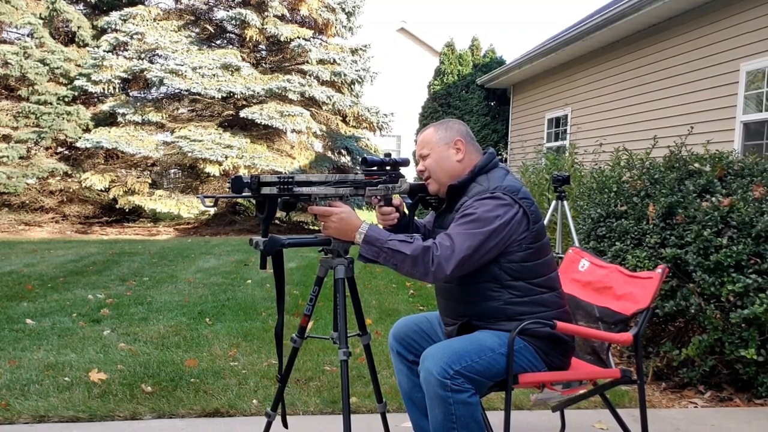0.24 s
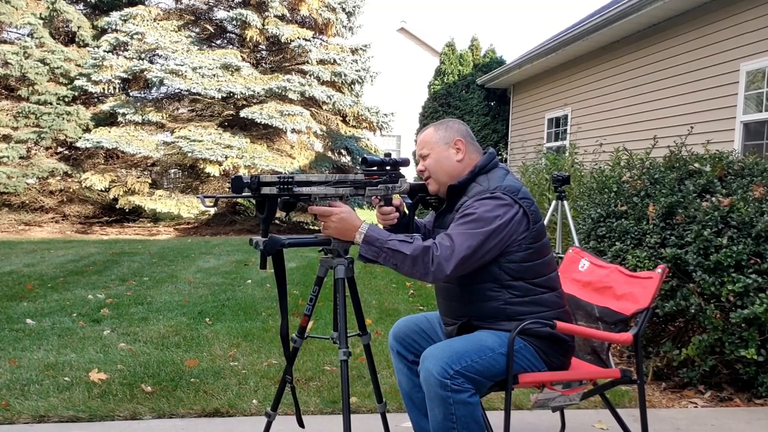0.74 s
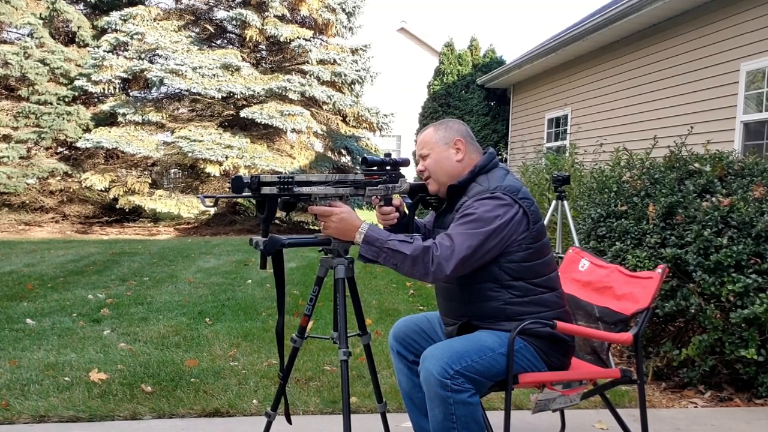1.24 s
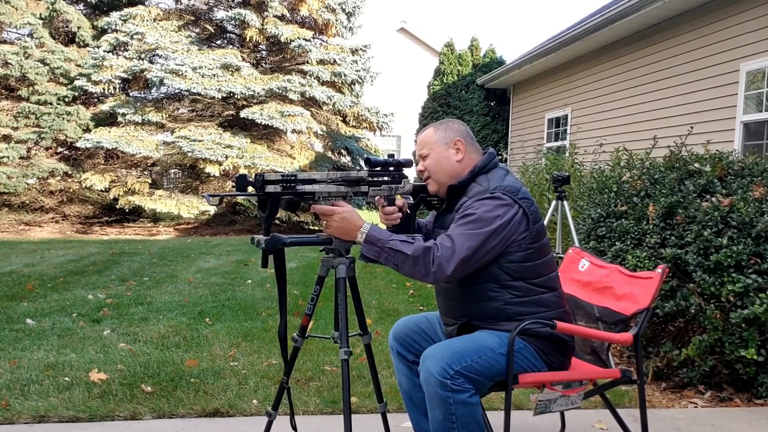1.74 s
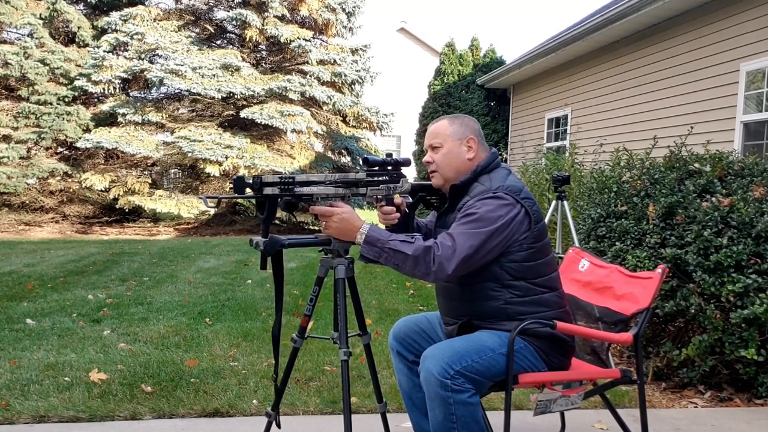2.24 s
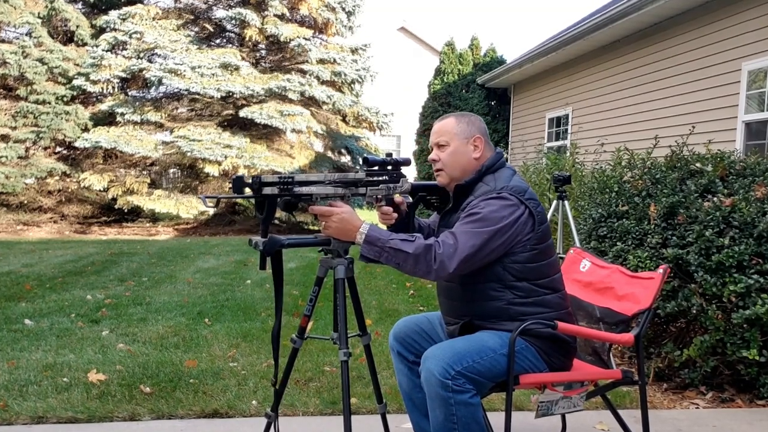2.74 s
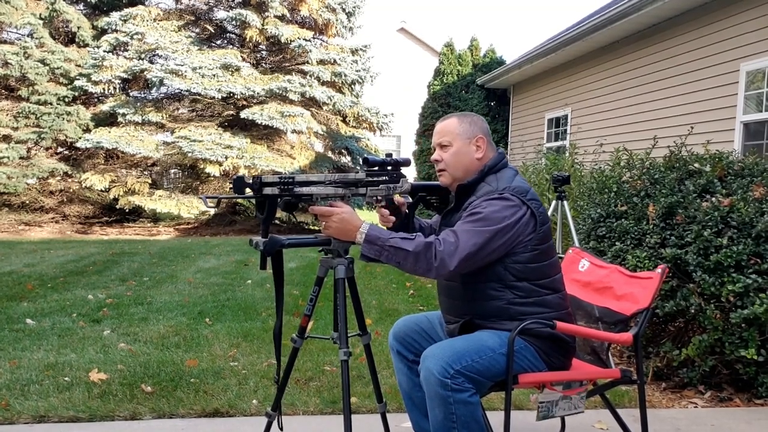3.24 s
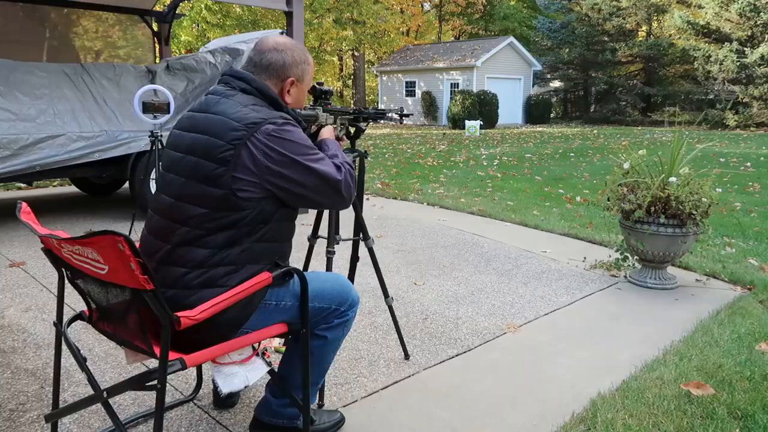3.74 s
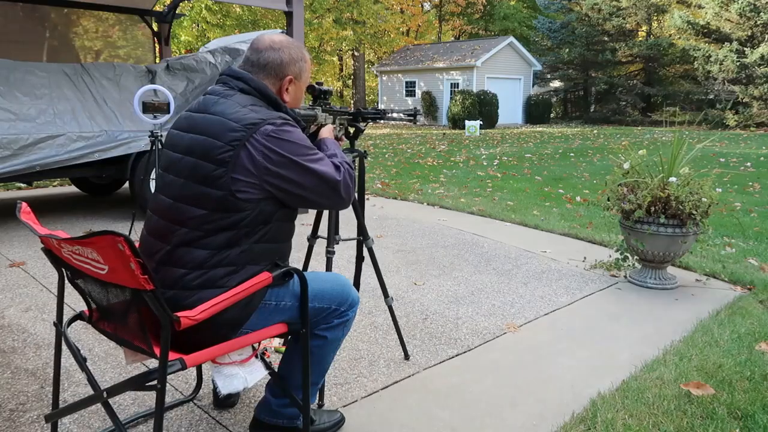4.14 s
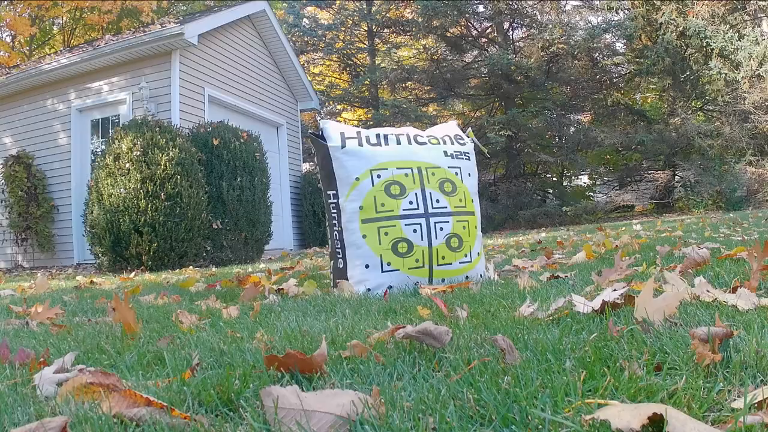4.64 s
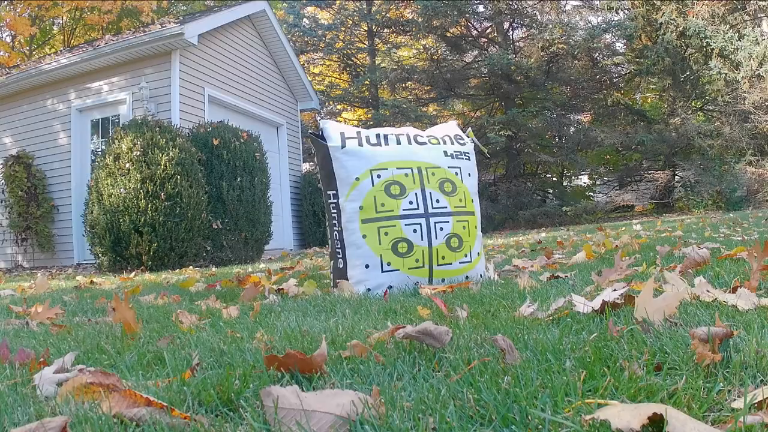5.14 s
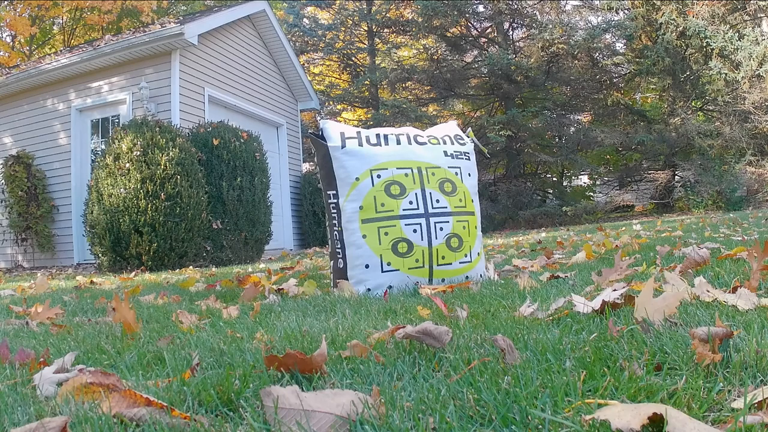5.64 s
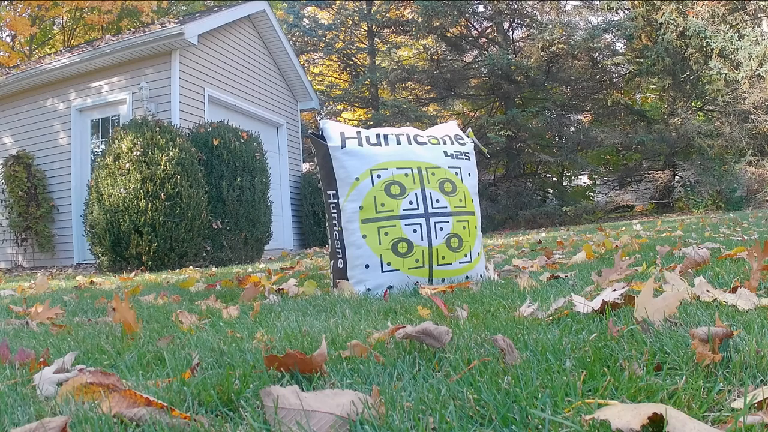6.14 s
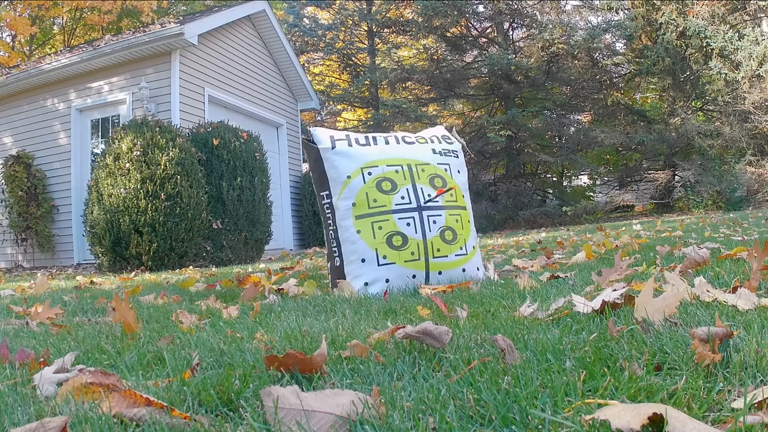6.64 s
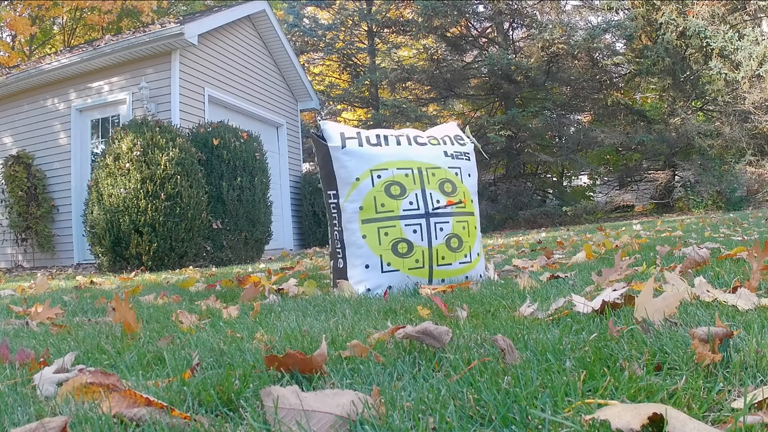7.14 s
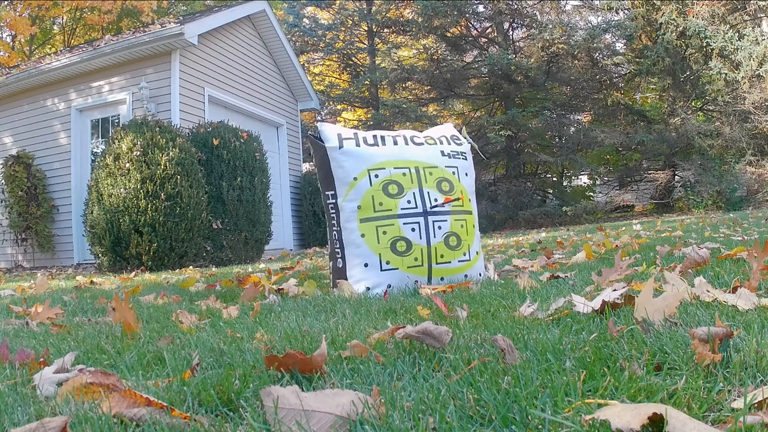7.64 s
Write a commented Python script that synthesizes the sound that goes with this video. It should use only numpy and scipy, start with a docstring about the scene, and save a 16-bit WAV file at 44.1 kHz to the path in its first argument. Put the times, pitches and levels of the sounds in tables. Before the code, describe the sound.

After low wind thuds on the microphone, a crossbow snaps and its bolt smacks a stuffed bag, three times from different outdoor spots.

```python
"""A crossbow is shot in a backyard and heard three times: from the side, from behind the shooter, at the target.
Shaped noise makes the latch and string snap and the frame rattle; short pulses kick the stock; sines ring its metal.
The bolt rushes in as swelling noise and hits a stuffed bag: one pulse slaps the cover, a later one is the thump.
Buildings, trees and lawn return the blows as filtered, smeared echoes and a diffuse tail; the loudest blows clip.
Wind noise buffets the microphone, mostly at the first place, over rumble, hiss and thin tones."""
import sys
import numpy as np
from scipy import signal
from scipy.fft import rfft, irfft, next_fast_len
from scipy.io import wavfile
from scipy.ndimage import uniform_filter1d

SR = 44100
rng = np.random.default_rng(int(sys.argv[2]) if len(sys.argv) > 2 else 0)


def generate_wav(sig):
    """Save sig (samples, or channels by samples) to the path in sys.argv[1] as 16-bit PCM at SR."""
    pcm = np.round(np.clip(np.atleast_2d(sig).T, -1, 1) * 32767).astype(np.int16)
    wavfile.write(sys.argv[1], SR, pcm)


N = 348390
TIME = np.arange(N) / SR  # s

# borders between the listening places: (time [s])
PLACE_BORDERS = [0, 3.385, 4.675, 8]
# the bolt hits, one row a place: (time [s], slap peak [dB], lag of the thump [s], thump peak [dB])
BOLT_HITS = [(2.0406, 2, 0.004, -2), (4.1567, 1, .0037, -6), (6.4834, 6.5, 0.0026, 7.5)]
# string, cables and limbs rattle, one row a place: (time of the top [s], rms level [dB], rise [s], hold [s],
# fall [dB/s], after-ring against the top [dB], fade of the after-ring [dB/s])
FRAME_RATTLES = [(1.831, -12, 0.0032, .028, 619, -22.5, 117.5),
                 (3.938, -14.5, 0.0049, 0.0055, 540.5, -20.5, 260),
                 (6.359, -38, 0.002016, 0.00198, 1699, -16, 131)]
# diffuse return of the yard, one row a place: (bow send [dB], slap send [dB], thump send [dB], build-up [s])
YARD_RETURNS = [(-27.5, -9, -14.5, 0.035), (-30.5, -13, -12, 0.026), (-24, -26, -32, 0.0606)]
# microphones, one row a place: (left-right likeness of reflections [0-1], lead of the right port [samples])
MICROPHONE_PORTS = [(.45, 17), (.85, 0), (1, 0)]


def amp(db):
    """Decibels to gain."""
    return 10 ** (np.asarray(db) / 20)


def unit(x):
    """Scales to rms 1."""
    return x / np.sqrt(np.mean(x ** 2) + 1e-20)


def read(points, hz):
    """Reads a spectrum on a log-frequency axis."""
    f, value = np.transpose(points)
    return np.interp(np.log(hz + 1), np.log(f + 1), value)


def level(points):
    """Gain along a curve of (time [s], level [dB]), silent outside it."""
    s, db = np.transpose(points)
    return amp(np.interp(TIME, s, db)) * (TIME >= s[0]) * (TIME <= s[-1])


def bell(s, width):
    """A smooth Gaussian swell of height 1 around the time s; width is its standard deviation in s."""
    return np.exp(-0.5 * np.minimum(((TIME - s) / width) ** 2, 40))


def sunk(s):
    """Goes from 0 to 1 just after the time s."""
    sink_s = 0.15
    return np.clip((TIME - s) / sink_s, 0, 1)


def heard(place):
    """1 while a place is listened to, else 0, with edges some 3 ms long."""
    inside = (TIME >= PLACE_BORDERS[place]) * (TIME < PLACE_BORDERS[place + 1])
    return uniform_filter1d(1.0 * inside, size=128)


def within(rows, place):
    """The events heard from one place."""
    return [row for row in rows if PLACE_BORDERS[place] <= row[0] < PLACE_BORDERS[place + 1]]


def placed(s, sound):
    """A track that is silent but for one sound starting at s."""
    track = np.zeros(sound.shape[:-1] + (N,))
    part = track[..., round(s * SR):][..., :sound.shape[-1]]
    part += sound[..., :part.shape[-1]]
    return track


def noise(colour, same, size=N):
    """Two channels of coloured noise of joint rms 1; same is their likeness, a number or a curve over Hz."""
    n = next_fast_len(size)
    hz = np.fft.rfftfreq(n, 1 / SR)
    left, other = rfft(rng.standard_normal((2, n)))
    likeness = np.clip(same if np.isscalar(same) else read(same, hz), -1, 1)
    right = likeness * left + np.sqrt(1 - likeness ** 2) * other
    spectrum = np.array([left, right]) * amp(read(colour, hz))
    return unit(irfft(spectrum, n)[:, :size])


def scatter(same, size):
    """Dense random values for two ports, alike by the share same."""
    left, other = rng.standard_normal((2, size))
    same = np.clip(same, -1, 1)
    return np.array([left, same * left + np.sqrt(1 - same ** 2) * other])


def lumps(length, depth_db, size):
    """A random gain of rms 1 that wanders over about size steps."""
    wander = unit(uniform_filter1d(rng.standard_normal(length), size))
    return unit(amp(depth_db * wander))


def whistle(hz, width_hz, same):
    """A fuzzy tone of rms 1: a narrow band of noise around a steady or moving pitch."""
    low_pass = signal.butter(2, width_hz / 2, fs=SR, output="sos")
    slow = signal.sosfilt(low_pass, scatter(same, N) + 1j * scatter(same, N))
    cycles = np.cumsum(hz * np.ones(N)) / SR
    return unit((slow * np.exp(2j * np.pi * cycles)).real)


def blow(colour, pitch=1, size=4096):
    """A minimum-phase pulse of given colour and peak 1: its energy comes as early as a causal pulse allows."""
    hz = np.fft.rfftfreq(size, 1 / SR) / pitch
    log_gain = np.log(amp(read(colour, hz)))
    log_gain -= 2 * np.log(np.maximum(hz / colour[-1][0], 1))  # falls away above the last point
    mirrored = np.r_[log_gain, log_gain[-2:0:-1]]
    pulse = np.fft.ifft(np.exp(np.conj(signal.hilbert(mirrored)))).real[:size // 2]
    return pulse / abs(pulse).max()


def through(x, response):
    """Passes a sound through a two-channel response."""
    return signal.oaconvolve(np.atleast_2d(x), response, axes=1)[:, :N]


def band_limit(x, hz):
    """A steep low-pass."""
    taps = signal.firwin(255, hz, window=("kaiser", 8), fs=SR)
    return signal.oaconvolve(x, taps[None], "same", axes=1)


def tones():
    """Narrow noise bands: a distant tone dies away from the start; a thin whine at the second place sinks."""
    far_db, far_fade_db_per_s = -65.5, 26
    far = amp(far_db - far_fade_db_per_s * TIME) * whistle(1940, width_hz=12, same=0.32)
    whine_db, whine_sink_db = -81, 13.5  # level before the shot, and its drop after it
    whine_gain = amp(whine_db - whine_sink_db * sunk(FRAME_RATTLES[1][0]))
    whine = whine_gain * whistle(12960, width_hz=60, same=0.5)
    return far + heard(1) * whine


def air(place, split_hz=400):
    """Far rumble and the hiss of the open air, split from one noise wash; both sink after the hit."""
    # outdoor air, one colour a place: (frequency [Hz], relative level [dB])
    air_colour = [
        [(15, -64), (25, -34), (48, -8), (88, -11), (128, 0.02), (186, -8), (219, -15), (318, -19), (415, -33),
         (749, -30), (1280, -36), (1910, -32), (3800, -35), (5200, -40), (6500, -36), (8100, -42),
         (11200, -35.5), (15000, -44)],
        [(15, -40), (25, -10), (86, -8), (128, 0.94), (158, -11), (196, -13), (278, -19), (709, -20),
         (1180, -25), (1350, -25), (3540, -32), (9770, -51), (12400, -55), (13500, -53), (15000, -97)],
        [(15, -30), (25, 0.07), (38, -4), (70, -1), (96, -12), (129, -1), (152, -19), (183, -14), (204, -22),
         (233, -19), (389, -28), (470, -25), (649, -29), (4150, -40), (15500, -42)],
    ]
    # left-right likeness of the air, one curve a place: (frequency [Hz], likeness [0-1])
    air_same = [
        [(60, 0.75), (300, 0.64), (1400, 0), (15000, 0)],
        [(100, 1), (300, .6), (1400, .7), (3100, 0.4), (9000, 0.029)],
        [(60, 1), (15000, 1)],
    ]
    # one row a place: (rumble before the hit [dB], settled hiss before the hit [dB], rumble drop [dB], hiss drop [dB])
    air_levels = [(-56.5, -62.5, 1.5, 7.5), (-45, -51, 11.5, 10.5), (-60, -73.5, 0.5, 0.5)]
    rumble_db, hiss_db, rumble_sink_db, hiss_sink_db = air_levels[place]
    after = sunk(BOLT_HITS[place][0])
    wash = noise(air_colour[place], air_same[place])
    rumble = signal.sosfiltfilt(signal.butter(3, split_hz, fs=SR, output="sos"), wash)
    hiss = wash - rumble
    opening_db = 7 * np.exp(-TIME / 0.27)  # the hiss starts louder and settles
    rumble_gain = amp(rumble_db - rumble_sink_db * after)
    hiss_gain = amp(hiss_db + opening_db - hiss_sink_db * after)
    return rumble_gain * unit(rumble) + hiss_gain * unit(hiss)


def wind():
    """Turbulent eddies hit each port on its own; the hardest ones flutter higher up, and each gust sighs."""
    # gusts at the first microphone: (time [s], width [s], rumble [dB], sigh [dB], sigh pitch at the top [Hz])
    gusts = [(.45, .18, -31.5, -55, 865), (1.22, 0.2, -36, -68.5, 963.7)]
    # single eddies that buffet the microphone: (time [s], rms level [dB], width [s], left against right [dB])
    buffets = [(.005, -25.5, 0.031, -1.5), (0.163, -17.5, 0.037, -7.5), (.208, -7, .005, 2.5),
               (0.389, -12, 0.013, -22), (.434, -11, .0098, -11), (0.53, -13.5, 0.024, -15.5),
               (0.564, -11.5, 0.0065, -8), (0.941, -27.5, 0.034, 3), (1.207, -23.5, 0.0076, -6),
               (3.037, -37, 0.018, 9), (3.454, -33.5, 0.018, 2)]
    # low roar of the eddies: (frequency [Hz], relative level [dB])
    wind_colour = [(20, -13.5), (45, 2), (70, 8), (130, -4.5), (200, -14.5), (330, -30), (600, -47.5),
                   (1200, -61.5), (3000, -87)]
    flutter_colour = [(60, -11.5), (170, 8.5), (300, -11.0), (600, -31), (1200, -38.0), (3000, -73)]
    breeze_db = -58  # what stirs between the gusts
    sigh_sag_hz_per_s = 450  # each sigh sinks in pitch as its gust passes
    power = np.ones((2, 1)) * (amp(breeze_db) * heard(0)) ** 2
    sighs = np.zeros((2, N))
    for s, width, rumble_db, sigh_db, hz in gusts:
        swell = bell(s, width)
        power += (amp(rumble_db) * swell) ** 2
        pitch_hz = hz - sigh_sag_hz_per_s * (TIME - s)
        sighs += amp(sigh_db) * swell ** 1.7 * whistle(pitch_hz, width_hz=210, same=0.5)
    for s, db, width, pan_db in buffets:
        sides = unit(amp([[pan_db], [0]]))
        power += (amp(db) * sides * bell(s, width)) ** 2
    eddies = noise(wind_colour, 0)
    # even out the noise, so that the gusts and buffets alone set its strength
    local_power = uniform_filter1d(uniform_filter1d(eddies ** 2, size=900), size=900)
    eddies /= np.sqrt(local_power)
    flutter = amp(-8.5) * power * noise(flutter_colour, 0)
    return np.sqrt(power) * eddies + flutter + sighs


def wall(place, delay, smear):
    """One echo: a flat wall is a mirror, a rough one smears the sound, and long paths lose their treble."""
    t = TIME[:SR // 4]
    if smear < 0.0006:
        taps = np.ones((2, 1)) * (t == 0)
    else:
        taps = scatter(MICROPHONE_PORTS[place][0], len(t)) * t * np.exp(-t / smear)
    taps /= np.linalg.norm(taps, axis=1, keepdims=True)
    dull_hz = 15000 / (1 + delay / 0.07)
    return signal.sosfilt(signal.butter(3, dull_hz, fs=SR, output="sos"), taps)


def yard(place):
    """Uneven scatter from lawn, trees and siding: it builds up, then each band fades at its own pace."""
    # time to fade by 60 dB: (frequency [Hz], time [s])
    yard_t60 = [(60, 0.99), (250, .85), (700, 0.58), (2500, 1), (5000, 0.74), (9000, 0.38), (15000, .25)]
    build_up_s = YARD_RETURNS[place][3]
    grain = lumps(SR, depth_db=2.5, size=400)
    hz, t, z = signal.stft(grain * scatter(MICROPHONE_PORTS[place][0], SR), SR, nperseg=256)
    fade = amp(-60 * t / read(yard_t60, hz)[:, None])
    build_up = (1 - np.exp(-t / build_up_s)) ** 2
    tail = signal.istft(z * fade * build_up, SR, nperseg=256)[1]
    return tail / np.sqrt(np.mean(abs(rfft(tail)[:, :4000]) ** 2))  # mean gain 1 below some 4 kHz


def clicks():
    """Two small clicks after the second hit, each a short pulse smeared over about a millisecond."""
    # the clicks: (time [s], level [dB])
    double_click = [(4.4687, -27), (4.4813, -30)]
    # (frequency [Hz], relative level [dB])
    click_colour = [(100, -8), (300, 11), (550, -25), (1070, -0.5), (2580, 1.5), (3590, -8), (4320, -31),
                    (6000, -39)]
    smear = wall(place=1, delay=0, smear=0.001)
    click = signal.fftconvolve(blow(click_colour)[None], smear, axes=1)
    return sum(placed(s, amp(db) * click) for s, db in double_click)


def flight():
    """The bolt's rush swells as it nears; a narrow whistle in it falls, probably combed by the ground reflection."""
    # falling whistle in the rush: (time [s], pitch [Hz], rms level [dB])
    falling_whistle = [(6.451, 2890, -65), (6.462, 2502, -62.5), (6.474, 1756, -55.5), (6.482, 1207, -54.5)]
    # rush of the bolt: (frequency [Hz], relative level [dB])
    flight_colour = [(40, -2.5), (250, -3.5), (420, -16), (750, -30), (1500, -29.5), (4000, -26),
                     (12000, -25.5), (15000, -49.5)]
    bolt_m_per_s, closest_m = 100, 0.57  # speed, and the distance from the microphone at the hit
    rush_db, rush_db_per_decade = -40.5, 27  # level at 1 m, and its loss per tenfold distance
    shot, hit = FRAME_RATTLES[-1][0], BOLT_HITS[-1][0]
    distance = np.hypot(bolt_m_per_s * (hit - TIME), closest_m)
    flying = (TIME > shot) * (TIME < hit)
    rush = amp(rush_db - rush_db_per_decade * np.log10(distance)) * flying
    s, hz, db = np.transpose(falling_whistle)
    falling_tone = whistle(np.interp(TIME, s, hz), width_hz=400, same=1)
    return rush * noise(flight_colour, 1) + level(np.c_[s, db]) * falling_tone


def dispersed(x, corner_hz):
    """Cloth and stuffing delay the lower waves (an all-pass), so a push swells over a cycle before it dies."""
    r = np.exp(-2 * np.pi * corner_hz / SR)
    out = signal.lfilter([-r, 1], [1, -r], x)
    return out / abs(out).max()


def bag(place):
    """The point slaps the cover; a moment later the stuffing stops the bolt with a thump. The yard answers."""
    # the taut cover, one colour a place: (frequency [Hz], relative level [dB])
    slap_colour = [
        [(60, -30), (350, -1), (700, -14), (1050, -33), (1600, -13), (2300, 0), (3200, -17), (3900, -20),
         (4700, -10), (6800, -13), (10000, -19), (14000, -28)],
        [(60, -30), (400, -6), (700, -13), (1050, -23), (1650, -21), (2400, 0), (3400, -1), (4500, -9),
         (6000, -19), (7000, -29), (11000, -28), (14500, -35)],
        [(60, -28), (300, -6), (600, -9), (1000, -12), (1500, -12), (2200, -10), (3200, -10), (4500, -16),
         (7000, -19), (10000, -26), (14500, -39)],
    ]
    # the stuffing, one colour a place: (frequency [Hz], relative level [dB])
    thump_colour = [
        [(25, -30.5), (60, -10), (110, -4.5), (170, 0), (240, 1.5), (340, -5), (480, -13.5), (700, -33),
         (1000, -41.5), (3000, -40)],
        [(25, -32.5), (60, -3.5), (110, -10), (170, 3), (240, 4), (340, -2), (480, -8.5), (700, -29),
         (1000, -29.5), (3000, -58)],
        [(25, -22), (60, -4.5), (110, -1.5), (170, 2.5), (240, 3.5), (340, -1), (480, -10.5), (700, -31),
         (1000, -38.5), (3000, -74.5)],
    ]
    # the slap scattered back off lawn, siding and trees, one colour a place: (frequency [Hz], relative level [dB])
    return_colour = [
        [(100, -17), (350, -6), (700, -4), (1200, -0.5), (2300, -1.5), (4200, -2.5), (6000, -10),
         (11500, -11.5), (13000, -36)],
        [(100, -19), (350, -1), (700, 8), (1200, 8.5), (2500, 6.5), (4000, -1), (6000, -10.5), (9000, -21),
         (14000, -43)],
        [(100, -10.5), (350, 3.5), (700, 1.5), (1200, 5), (2000, -4), (3800, -3.5), (6000, -12), (11500, -14),
         (14000, -31.5)],
    ]
    # ground and bushes close by scatter the hit at once, one row a place: (slap [dB], thump [dB], smear [s])
    near_scatter = [(-2, -9, 0.012), (-12.5, -13.5, 0.0047), (-37, -44.5, 0.017)]
    # walls and tree lines that echo, one list a place: (delay [s], slap [dB], thump [dB], smear [s])
    wall_echoes = [
        [(.0225, -14.5, -6, .00033), (.125, -37.5, -21.5, 0.0051), (.181, -20.5, -31, .02),
         (.3, -24, -32.5, 0.02)],
        [(.0133, -12.5, -12.5, 0.0063), (.124, -38, -17.5, .006)],
        [(.039, -41.5, -31.5, .006), (.08, -24.5, -30.5, 0.018), (.185, -58, -36, 0.0026)],
    ]
    s, slap_db, lag, thump_db = BOLT_HITS[place]
    lead = MICROPHONE_PORTS[place][1]
    length = SR // 10
    slap = -amp(slap_db) * placed(0, dispersed(blow(slap_colour[place]), corner_hz=2440))[:length]
    thump = -amp(thump_db) * placed(lag, dispersed(blow(thump_colour[place]), corner_hz=245.1))[:length]
    direct = slap + thump
    out = np.array([placed(s + lead / SR, direct), placed(s, direct)])  # the right port hears it first
    returned = placed(0, blow(return_colour[place]))[:length]
    for delay, slap_echo_db, thump_echo_db, smear in [(0, *near_scatter[place])] + wall_echoes[place]:
        sent = amp(slap_echo_db) * returned + amp(thump_echo_db) * thump
        out += placed(s + delay, through(sent, wall(place, delay, smear)))
    _, slap_wet_db, thump_wet_db, _ = YARD_RETURNS[place]
    sent = amp(slap_wet_db) * returned + amp(thump_wet_db) * thump
    return out + placed(s, through(sent, yard(place)))


def resonant(x):
    """The frame's crowd of resonances, each some 70 Hz wide, ripples the spectrum."""
    z = rfft(x)
    return unit(irfft(z * lumps(z.shape[1], depth_db=3.5, size=550), N))


def rattle(place):
    """The rattle swells, holds while the string swings, then falls fast and leaves a faint after-ring."""
    s, db, rise, hold, fall, after_db, fade = FRAME_RATTLES[place]
    sag_db_per_s = 230  # slow loss while the string still swings
    age = np.clip(TIME - s, 0, 1)
    buzz = amp(-sag_db_per_s * np.minimum(age, hold) - fall * np.maximum(age - hold, 0))
    after_ring = amp(after_db - fade * age)
    swell = np.exp(np.clip((TIME - s) / rise, -20, 0))
    return amp(db) * swell * np.hypot(buzz, after_ring)


def bow(place):
    """Latch and string stop snap, the stock kicks, and the whole frame buzzes and rings out."""
    # sharp blows in the bow: (time [s], rms level at the top [dB], rise [s], decay [s])
    snaps = [(1.8212, -4, 0.0012, 0.0022), (1.829, -4.5, 0.00023, 0.0013), (1.8312, -11, 0.0007, 0.001),
             (3.9257, -8.5, 0.00091, 0.0043), (3.9348, 1, 0.0008, .0035), (6.358, -37.5, .0001, 0.00024),
             (6.3605, -59.5, 0.00096, 0.0059)]
    # the string stop kicks the stock, and a small thump follows it at the third place: (time [s], peak [dB],
    # pitch factor)
    kicks = [(3.9325, 1, 1.18), (3.9362, -15.5, 2.9), (6.3578, -29, 1.2), (6.3778, -38, 0.87)]
    # snaps, one colour a place: (frequency [Hz], relative level [dB])
    snap_colour = [
        [(60, -28.5), (400, -12), (1200, -11.5), (3000, -1.5), (7000, -6.5), (12000, 2), (14200, -5.5),
         (15200, -25)],
        [(60, -10), (400, 10.5), (800, -13.5), (2600, 1.5), (5000, -4.5), (9500, -7.5), (14500, -15.5),
         (16000, -21)],
        [(60, -1.5), (400, 8), (1400, 9), (3500, 2.5), (11000, -5), (15000, -19.5)],
    ]
    # rattling frame, one colour a place: (frequency [Hz], relative level [dB])
    rattle_colour = [
        [(40, -21), (150, -6), (380, -2.5), (800, -10), (2000, -4), (3100, -2.5), (6400, -5), (11000, -2),
         (14200, -3), (15000, -28.5)],
        [(40, -6.5), (90, -3.5), (190, -9), (370, -3), (800, -7.5), (2500, -6.5), (5000, -10.5), (9000, -16.5),
         (14500, -27), (16000, -38.5)],
        [(60, 0.5), (400, 0), (900, -18.5), (1600, -6), (3500, -4.5), (6000, -10), (11000, -9), (15000, -38.5)],
    ]
    # left-right likeness of the bow, one curve a place: (frequency [Hz], likeness [0-1])
    bow_same = [
        [(100, .9), (1200, .65), (3000, .35), (6000, .1), (15000, .05)],
        [(100, .8), (1200, .65), (3000, .6), (8000, .25)],
        [(100, 1), (15000, 1)],
    ]
    # ringing metal parts: (frequency [Hz], relative level [dB], time to fade by 60 dB [s])
    bow_modes = [(3160, 2.5, 0.1), (6000, -10, 0.21), (7208, -16.5, 0.23), (9400, 0.5, 0.11),
                 (10764, -4.5, 0.16), (13700, -5.5, 0.18)]
    # gain of the whole metal ring, one a place: (gain [dB])
    ring_gains = [-33.5, -50, -69]
    # far buildings return the shot, one row a place: (delay [s], gain [dB], smear [s])
    shot_echo = [(0.16, -28.5, 0.0079), (.152, -34, 0.012), (0.095, -26, .005)]
    stock_colour = [(30, -9.5), (90, 0.5), (200, -5.5), (350, -1.0), (600, -18.5), (1200, -25.5), (4000, -52.5)]
    same = bow_same[place]
    power = np.zeros(N)
    for s, db, rise, decay in within(snaps, place):
        away = np.maximum((s - TIME) / rise, (TIME - s) / decay)
        power += amp(db) ** 2 * np.exp(-2 * np.minimum(away, 20))
    out = np.sqrt(power) * noise(snap_colour[place], same)
    # loose parts chatter, so the rattle comes in clumps about a millisecond long
    chatter = lumps(N, depth_db=2.0, size=40)
    out += rattle(place) * chatter * resonant(noise(rattle_colour[place], same))
    for s, db, pitch in within(kicks, place):
        out -= placed(s, amp(db) * blow(stock_colour, pitch))
    t = TIME[:SR // 2]
    ring = np.zeros(len(t))
    for hz, db, t60 in bow_modes:
        decay = np.exp(-np.log(1000) * t / t60)
        ring += amp(db) * decay * np.sin(2 * np.pi * (hz * t + rng.random()))
    last_snap_s = within(snaps, place)[-1][0]
    out += placed(last_snap_s, amp(ring_gains[place]) * ring)
    delay, echo_db, smear = shot_echo[place]
    echo = placed(delay, through(out, wall(place, delay, smear)))
    return out + amp(echo_db) * echo + amp(YARD_RETURNS[place][0]) * through(out, yard(place))


def scene():
    """The three places follow one another with cuts some 3 ms long; the first has a lower treble limit."""
    # upper limit of the sound, one a place: (frequency [Hz])
    top_hz = [14700, 15800, 15800]
    out = tones() + wind() + clicks() + flight()
    for place in range(len(BOLT_HITS)):
        out += heard(place) * band_limit(air(place) + bag(place) + bow(place), top_hz[place])
    return out


def record(dry):
    """Full scale flattens the loudest blows; then a low-pass takes the top."""
    return band_limit(np.clip(dry, -1, 1), hz=15900)


dry = scene()
out = record(dry)
generate_wav(out)
```